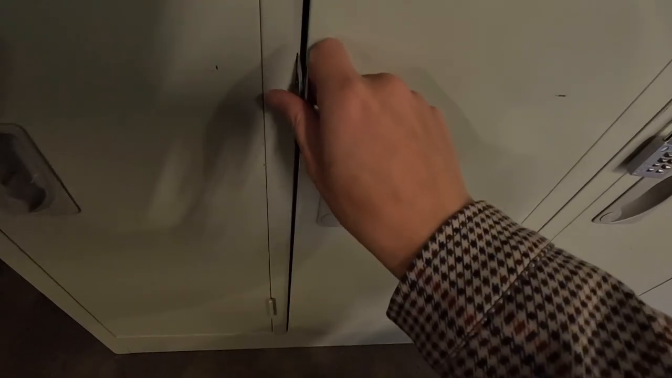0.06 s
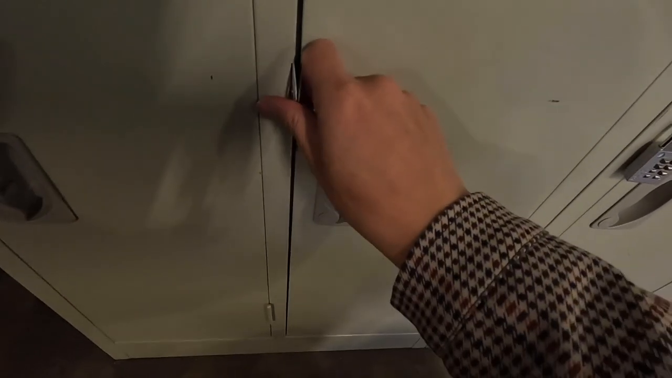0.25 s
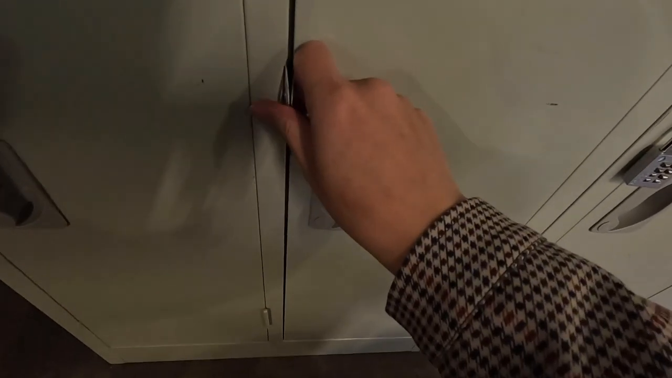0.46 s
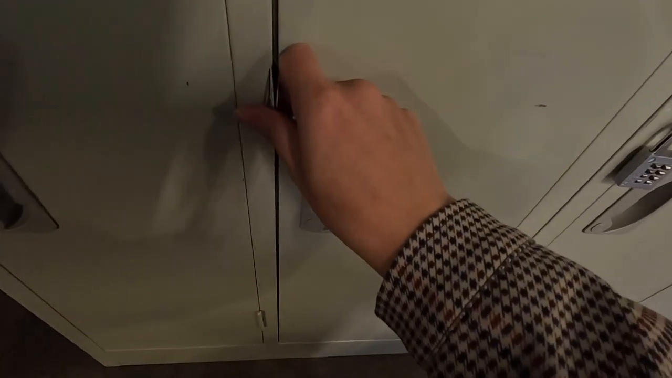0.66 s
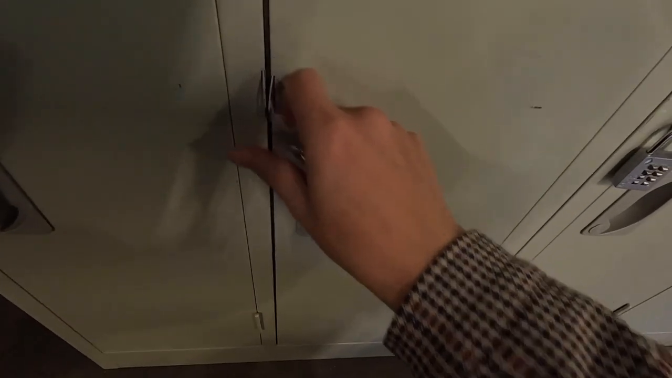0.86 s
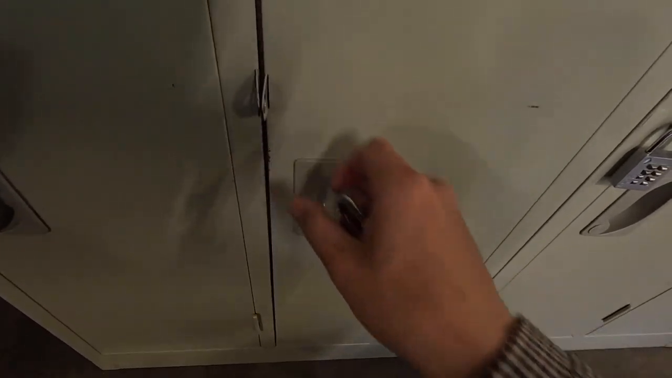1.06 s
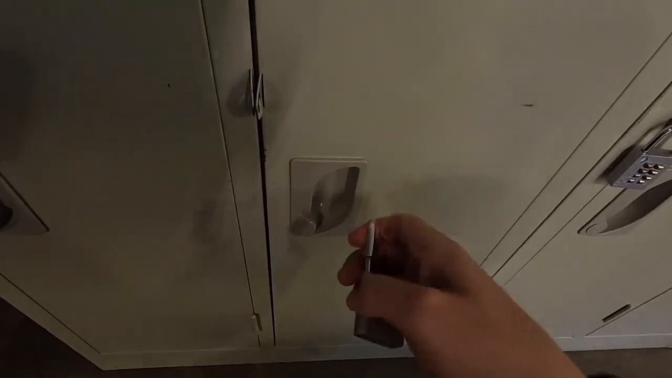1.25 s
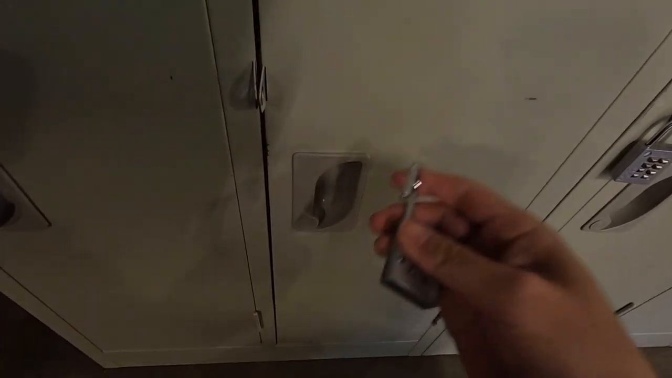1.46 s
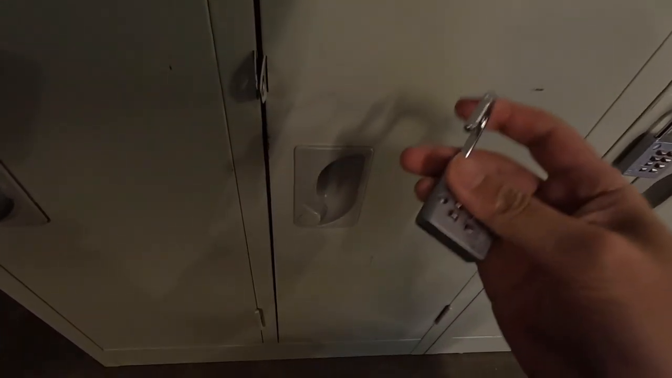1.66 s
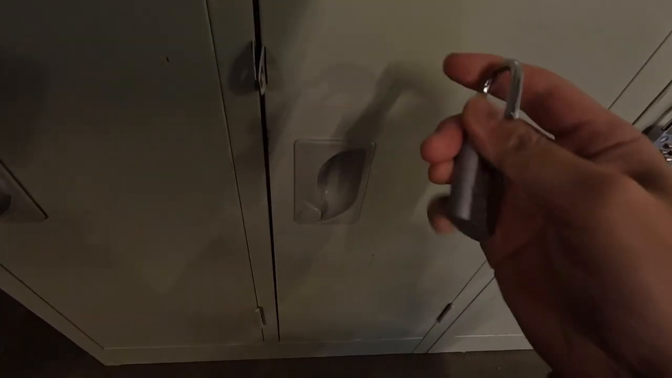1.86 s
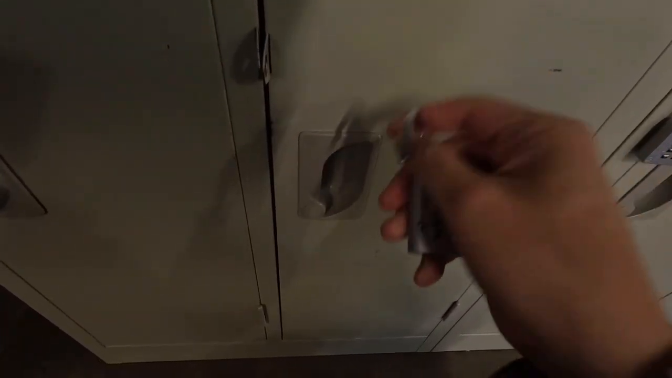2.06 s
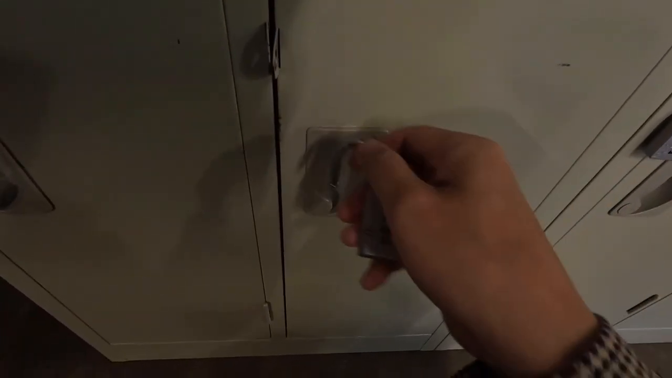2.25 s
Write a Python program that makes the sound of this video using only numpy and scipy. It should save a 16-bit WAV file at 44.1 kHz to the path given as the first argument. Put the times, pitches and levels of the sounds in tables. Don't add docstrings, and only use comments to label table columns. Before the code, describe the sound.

Sheet-metal locker door rattles and bangs shut, then a small padlock clicks in the hand

```python
import sys
import numpy as np
from scipy import signal
from scipy.fft import rfft, irfft
from scipy.io import wavfile
from scipy.ndimage import uniform_filter1d

SR = 44100
rng = np.random.default_rng(int(sys.argv[2]) if len(sys.argv) > 2 else 0)


def convert_level_to_amplitude(level_db):
    exponent = np.asarray(level_db, float) / 20
    return 10 ** exponent


def unload_wav(signal):
    wavfile.write(
        sys.argv[1],
        SR,
        np.round(np.clip(np.atleast_2d(signal).T, -1, 1) * 32767).astype(np.int16),
    )


N = 101430
LR = np.array([[1], [-1]])
PANEL_RISE_S = 0.0063


def logf(hz, table):
    tab = np.array(table, float)
    return np.interp(np.log(np.maximum(hz, 1)), np.log(tab[:, 0]), tab[:, 1])


def curve(table):
    tab = np.array(table, float)
    return np.interp(np.arange(N) / SR, tab[:, 0], tab[:, 1])


def unit(x):
    return x / np.sqrt(np.mean(x ** 2))


def bump(hz, centre, width, db):
    return db * np.exp(-(2 * (hz - centre) / width) ** 2)


def noise(size, colour_db, side):
    hz = np.arange(size // 2 + 1) * SR / size
    mid, sd = rfft(rng.standard_normal((2, size)))
    stereo = mid + LR * sd * convert_level_to_amplitude(logf(hz, side))
    return stereo * convert_level_to_amplitude(colour_db(hz)) / np.sqrt(size), hz


def add(out, x, s):
    i = int(s * SR)
    out[..., i:i + x.shape[-1]] += x[..., :N - i]


def ring(t, t60, rise):
    return (1 - np.exp(-t / rise)) * np.exp(-np.log(1000) * t / t60)


def walk(rate):
    k = int(SR / rate)
    steps = np.repeat(rng.standard_normal(N // k + 1), k)
    smooth = uniform_filter1d(uniform_filter1d(steps, k), k)
    return unit(smooth[:N])


# f/Hz, level per Hz/dB
VENT_COLOUR = [(20, 4.5), (100, -10.5), (260, -6.5), (520, -17), (780, -33.5), (2600, -35.5), (7400, -42.5),
               (10500, -55), (14500, -65)]
# f/Hz, level/dB
VENT_SIDE = [(40, -9.5), (200, -17), (700, -7), (1500, -5), (5000, -4), (15000, -7.5)]
# f/Hz, width/Hz, level/dB
VENT_BUMP = (1610, 1510, 10.6)
# f/Hz, width/Hz, level/dB
VENT_SHELF = (12100, 1500, 11)
# t/s, level/dB
VENT_SWELL = [(0, -43.5), (.6, -51.5), (1, -48.5), (1.4, -46), (1.8, -48), (2.3, -47)]


def ventilation():
    def colour(hz):
        return logf(hz, VENT_COLOUR) + bump(hz, *VENT_BUMP) + bump(hz, *VENT_SHELF)

    spec, hz = noise(N, colour, VENT_SIDE)
    octave = np.log2(np.maximum(hz, 1))
    out = 0
    for step in range(11):
        band = np.clip(1 - abs(octave - 4 - step), 0, 1)
        out = out + irfft(spec * band, N) * convert_level_to_amplitude(1.7 * walk(8.94))
    return unit(out) * convert_level_to_amplitude(curve(VENT_SWELL))


# t/s, level/dB
RUMBLE_SWELL = [(.5, -41), (.9, -46.5), (1.15, -42.5), (1.5, -55), (1.75, -52), (2.3, -49)]


def handling_rumble():
    top_hz = 54.5
    band = signal.butter(2, [top_hz / 3.1, top_hz], "band", fs=SR, output="sos")
    return unit(signal.sosfilt(band, rng.standard_normal(N))) * convert_level_to_amplitude(curve(RUMBLE_SWELL))


# t/s, length/s, f/Hz, level/dB
SQUEAK_EVENT = (1.18, .12, 1490, -65)


def squeak():
    s, length, f, db = SQUEAK_EVENT
    t = np.arange(N) / SR
    level = convert_level_to_amplitude(db + 2 * walk(28.4))
    pitch = f * (1 + 0.0102 * walk(10.4))
    tone = level * np.sin(2 * np.pi * np.cumsum(pitch) / SR)
    return tone * np.exp(-(2 * (t - s) / length - 1) ** 4)


def room(x):
    level_db, t60_s, rise_s = -16, .22, .003
    t = np.arange(SR // 2) / SR
    mid, side = rng.standard_normal((2, len(t))) * ring(t, t60_s, rise_s)
    tail = signal.lfilter([1], [1, -.1], mid + 0.34 * LR * side)
    tail = tail / np.sqrt(np.sum(tail[0] ** 2))
    return convert_level_to_amplitude(level_db) * signal.fftconvolve(x[None], tail, axes=1)[:, :N]


# f/Hz, level/dB, t60/s
LOCK_MODES = [(2400, -7.5, 0.0066), (2605, -5, 0.013), (3255, 4, 0.011), (3500, 3.5, .013),
              (4380, -6, 0.005), (5000, -2, 0.012), (5530, -9, 0.007), (6000, -11, 0.004),
              (7040, -6.5, 0.017), (7530, -5, 0.016), (8480, -4.5, 0.02), (9910, -18, 0.004),
              (11500, -20, 0.004), (12600, -22, 0.003)]


def lock_body(t, bright_db, palm_db, share):
    scatter_db, detune, crack_db, crack_s = 1.5, .012, -3, 0.0014
    f, g, d = np.array(LOCK_MODES, float).T[:, :, None]
    u = rng.standard_normal((3, len(LOCK_MODES), 1))
    tilt = bright_db * (f > 3900) + palm_db * (f > 8000)
    pitch = f * (1 + detune * (f / 4000) * u[1])
    level = convert_level_to_amplitude(g + tilt + scatter_db * u[0]) * np.sign(u[2])
    modes = (level * np.sin(2 * np.pi * pitch * t) * ring(t, d * share, .0001)).sum(0)
    crack = signal.lfilter([1, 2, 1], [3, -.9], rng.standard_normal(len(t))) * np.exp(-t / crack_s)
    band = signal.butter(3, [2300, 14500], "band", fs=SR, output="sos")
    return signal.sosfilt(band, modes + convert_level_to_amplitude(crack_db + bright_db + palm_db) * crack)


def rattle_hits(length):
    contacts_per_s, scatter_db = 1200, 5
    v = rng.random((3, 24))
    when = np.cumsum(-np.log(1 - v[0])) / contacts_per_s
    when -= when[0]
    fade = np.exp(-when / length) * np.clip(3 - 2 * when / length, 0, 1)
    size = convert_level_to_amplitude(scatter_db * 2 * (v[1] - .5)) * np.sign(v[2] - .5) * fade
    hits = np.zeros(2048)
    place = np.minimum((when * SR).astype(int), 2047)
    np.add.at(hits, place, size / np.sqrt(np.sum(size ** 2)))
    return hits


# t/s, peak level/dB, rattle length/s, brightness/dB, ring share/1
HAND_CLICKS = [(1.1497, -44.5, .002, -5, .7), (1.162, -48, .002, -14, 0.52),
               (1.164, -37, 0.0018, -13.5, 0.67), (1.169, -33.5, 0.0016, -14, 0.66),
               (1.172, -47.5, .002, -8, 0.79), (1.187, -40, .002, -7, 0.8), (1.192, -44, .003, -9, .6),
               (1.201, -29.5, 0.0034, -14, 0.49), (1.2041, -27, 0.0014, -14, .7),
               (1.2051, -31, 0.0025, -10, 0.63), (1.2084, -39.5, .004, 1, 1), (1.219, -47, 0.0067, -6.5, 1),
               (1.229, -43.5, .003, -7, .7), (1.232, -39.5, 0.0017, -8, .7),
               (1.2331, -37, 0.0043, -5, 0.83), (1.24, -43, 0.0046, -6, 0.95),
               (1.2455, -22.5, 0.00019, -6, .35), (1.2484, -33, 0.0018, -2, 0.26),
               (1.252, -44, 0.0054, -1.5, .8), (1.331, -49, .008, -5.5, 0.92),
               (1.4263, -21.5, 0.00026, -12.5, 0.32), (1.4274, -37, .002, -4.5, 0.47),
               (1.439, -54.5, 0.0046, -3, 0.64), (1.645, -53.5, 0.0022, 10.5, 0.73),
               (1.68, -53, .0017, 8, 0.78)]
# t/s, peak level/dB, rattle length/s, brightness/dB, ring share/1
HASP_SNAPS = [(1.8442, -39, 0.0024, -3, .5), (1.8479, -28.5, 0.0032, 4, 0.49),
              (1.8562, -15.5, .0004, -0.5, 0.19), (1.8574, -18.5, 0.0018, 8, .5),
              (1.8605, -29, 0.0032, -1.5, 0.68), (1.879, -44, .002, -2, 1), (1.918, -47, .0023, -4, 1),
              (2.094, -46.5, 0.00099, 17, 0.68), (2.129, -27, 0.0031, 4.5, 0.74),
              (2.134, -35.5, 0.0037, 7, 0.8), (2.142, -35.5, 0.0045, -4, 0.94), (2.151, -43, 0.013, 7, 1),
              (2.1793, -39.5, 0.0035, -1, .8), (2.199, -47, 0.0064, -6, 1), (2.217, -38, 0.0049, -14, .8),
              (2.2228, -27.5, .002, -7, 1), (2.2258, -28.5, 0.0022, -3, 1), (2.2289, -29, 0.00071, -1, 1),
              (2.23, -23.5, 0.00058, -5, 0.65), (2.2312, -13.5, 0.00046, -9, 0.94),
              (2.2328, -18.5, 0.00047, -3, 0.54), (2.2342, -26, 0.0024, -1, 0.55),
              (2.241, -35, 0.011, 8, 0.91), (2.246, -34, 0.005, 9, 1), (2.249, -31, 0.0018, -14, 0.92),
              (2.253, -33, .002, -4, .8), (2.257, -32, .004, -5, 1), (2.2684, -34, 0.0022, -12, .8),
              (2.272, -32.5, .003, -10, 0.94), (2.276, -33, 0.0025, -5, 0.8),
              (2.278, -39, 0.0044, -6, 0.99), (2.288, -47, .006, -2, 1)]


def padlock():
    out, t = np.zeros(N), np.arange(2048) / SR
    for s, db, length, bright_db, share in HAND_CLICKS + HASP_SNAPS:
        palm_db = -9 * (s < HASP_SNAPS[0][0])
        body = lock_body(t, bright_db, palm_db, share)
        click = signal.fftconvolve(rattle_hits(length), body)
        add(out, convert_level_to_amplitude(db) * click / abs(click).max(), s)
    return out


# f/Hz, level/dB
SIDE_SHARE = [(60, -39), (200, -32), (500, -14.5), (1200, -10.5), (4000, -7.5), (9000, -9), (15000, -1)]
# t/s, level/dB
SHUDDER_SWELL = [(0, -31.5), (.06, -38), (.12, -35), (.18, -37.5), (.235, -33)]
# f/Hz, level per Hz/dB
SHUDDER_COLOUR = [(15, -22), (25, 13.5), (196, 6.5), (588, -12.5), (1350, -14), (4620, -32.5), (8780, -52),
                  (11800, -34), (15000, -85.5)]


def shudder():
    spec, _ = noise(N, lambda hz: logf(hz, SHUDDER_COLOUR), SIDE_SHARE)
    t = np.arange(N) / SR
    stop_db = 460 * np.maximum(t - .25, 0)
    return unit(irfft(spec, N)) * convert_level_to_amplitude(curve(SHUDDER_SWELL) - 1.5 - stop_db + 1.5 * walk(25))


# t/s, level/dB, f/Hz
LATCH_TICKS = [(0.2563, -17.5, 2400), (0.278, -7.5, 7300), (0.28, -11.5, 3600), (0.282, -11, 4700),
               (0.3103, -23, 7200), (0.3314, -12.5, 7100), (0.337, -19.5, 4200), (0.3691, -16.5, 7200),
               (0.371, -20.5, 5400), (0.398, -29, 7100)]


def latch(out):
    q, decay_s = 3.8, .002
    t = np.arange(400) / SR
    for s, db, hz in LATCH_TICKS:
        tick = signal.filtfilt(*signal.iirpeak(hz, q, SR), rng.standard_normal(len(t)))
        add(out, convert_level_to_amplitude(db + 3.5) * tick * np.exp(-t / decay_s) * np.ones((2, 1)), s)


# t/s, level/dB, f/Hz, t60/s
KNOCK_THUMP = (.893, -28.5, 128, 0.41)


def thump(out, t):
    s, db, hz, t60 = KNOCK_THUMP
    tone = np.sin(2 * np.pi * hz * t) * ring(t, t60, PANEL_RISE_S)
    add(out, convert_level_to_amplitude(db) * tone * np.ones((2, 1)), s)


# f/Hz, level per Hz/dB
SHEET_COLOUR = [(25, -2), (160, 7), (400, -0.5), (1500, -10), (4500, -11.5), (7500, -21.5), (10500, -29.5),
                (16000, -49.5)]
# f/Hz, t60/s
SHEET_DECAY = [(40, 1.16), (150, 0.56), (300, 0.56), (700, 0.33), (2000, 0.31), (10000, 0.22)]
# f/Hz, rise/s
SHEET_ONSET = [(60, .015), (300, 0.018), (1000, 0.0012), (3000, 0.00046)]
# f/Hz, width/Hz, level/dB
SHEET_CROWDS = [(529, 32, 2), (990, 122, 8.5), (1387, 58, 6), (4700, 1200, 3), (6980, 840, 5)]


def sheet_wash(t, tilt, share):
    def colour(hz):
        return logf(hz, SHEET_COLOUR) + tilt(hz) + sum(bump(hz, *crowd) for crowd in SHEET_CROWDS)

    spec, hz = noise(len(t), colour, SIDE_SHARE)
    wash = 0
    for step in range(20):
        c = 2 ** (4.5 + step / 2)
        band = np.clip(1 - 2 * abs(np.log2(np.maximum(hz, 1) / c)), 0, 1)
        patch_db = 1.5 * np.interp(t * 60, np.arange(50), rng.standard_normal(50))
        envelope = ring(t, share * logf(c, SHEET_DECAY), logf(c, SHEET_ONSET))
        wash = wash + irfft(spec * band, len(t)) * convert_level_to_amplitude(patch_db) * envelope
    return wash


# f/Hz, level/dB, t60/s
UPPER_MODES = [(721,-6,0.3), (964,3,0.45), (1386,-2,0.35), (1558,-8.5,0.32), (1927,-6,0.31), (2330,-9,0.35),
               (3020,-12.5,0.24), (3140,-9.5,0.21), (3580,-8,0.25), (4280,-9.5,0.25), (4700,-9,0.3),
               (5240,-13.5,0.3)]


def upper_modes(t, tilt, share):
    level_db, rise_s, damp = -13, .002, .7
    f, g, d = np.array(UPPER_MODES, float).T[:, :, None]
    u = rng.standard_normal((3, len(UPPER_MODES), 1))
    tone = np.sin(2 * np.pi * f * (1 + .007 * u[1]) * t + 9 * u[2])
    envelope = ring(t, min(share, 1) * damp * d, rise_s)
    return convert_level_to_amplitude(level_db) * (convert_level_to_amplitude(g + tilt(f) + 3.1 * u[0]) * tone * envelope).sum(0)


# f/Hz, level/dB, t60/s
PANEL_MODES = [(33.3, -8.5, 0.81), (58, 0, 0.29), (67.7, -11, 0.6), (118, -2.5, .4), (130.8, -6, .4),
               (159.4, -4.5, 0.37), (189.3, -7.5, 0.19)]


def panel_modes(t, tilt, share):
    f, g, d = np.array(PANEL_MODES, float).T[:, :, None]
    u = rng.standard_normal((2, len(PANEL_MODES), 1))
    tone = np.sin(2 * np.pi * f * (1 + 0.011 * u[1]) * t)
    envelope = ring(t, min(share, 1) * d, PANEL_RISE_S)
    return (convert_level_to_amplitude(g + tilt(f) + 2 * u[0]) * tone * envelope).sum(0)


# t/s, level/dB, bass/dB, treble/dB, ring share of the full decay/1
DOOR_BLOWS = [(0.0, -39.5, -1.5, -12, 0.53), (0.0687, -41, -0.5, -8, 1.03), (0.12, -38.5, 7.5, -10.5, 0.26),
              (0.236, -23.5, 8.5, -9, 0.6), (0.2569, -19, -18, -3.5, 1.1), (0.2775, -15.5, 1.5, 0.5, 0.89),
              (0.31, -15.5, -5.5, -4.5, 0.96), (0.332, -20, -11, -2, 0.65), (0.369, -26, -6, -2.5, 1.02),
              (0.399, -44.5, -15, -1.5, 1.9), (0.7858, -50.5, -20.5, -2, 0.66), (0.8861, -29, -12, -6, 0.5),
              (0.897, -44, 4, -7.5, 1.07)]


def door():
    out, t = np.zeros((2, N)), np.arange(2 ** 15) / SR
    for s, db, bass_db, treble_db, share in DOOR_BLOWS:
        tilt_table = [(250, bass_db), (500, 0), (1800, 0.018), (3200, treble_db)]
        tilt = lambda hz: logf(hz, tilt_table)
        wash = sheet_wash(t, tilt, share)
        panel = panel_modes(t, tilt, share)
        upper = upper_modes(t, tilt, share)
        add(out, convert_level_to_amplitude(db) * (700 * wash - 1.29 * panel + upper), s)
    thump(out, t)
    latch(out)
    return out


# t/s, left minus right level/dB
LOCK_BALANCE = [(1.1, -2.5), (1.8, -5.5), (2.3, -4)]


def scene():
    background = ventilation() + handling_rumble() + squeak()
    lock = padlock()
    lock_direct = lock * convert_level_to_amplitude(LR * curve(LOCK_BALANCE) / 2)
    door_sound = (shudder() + door()) * convert_level_to_amplitude(LR * -0.8 / 3)
    return background + room(lock) + lock_direct + door_sound


def top_cut(x):
    return signal.sosfilt(signal.butter(12, 16240, fs=SR, output="sos"), x)


def record(dry):
    lag_fade_hz, top_hz = 9000, 15700
    hz = np.arange(N // 2 + 1) * SR / N
    lag = np.exp(-hz / lag_fade_hz)
    left = irfft(rfft(dry[0]) * np.exp(-2j * np.pi * hz / SR * lag), N)
    low_pass = signal.butter(16, top_hz, fs=SR, output="sos")
    x = signal.sosfilt(low_pass, np.array([left, dry[1]]))
    return top_cut(np.tanh(1.156 * x) / 1.028)


dry = scene()
out = record(dry)
unload_wav(out)
```